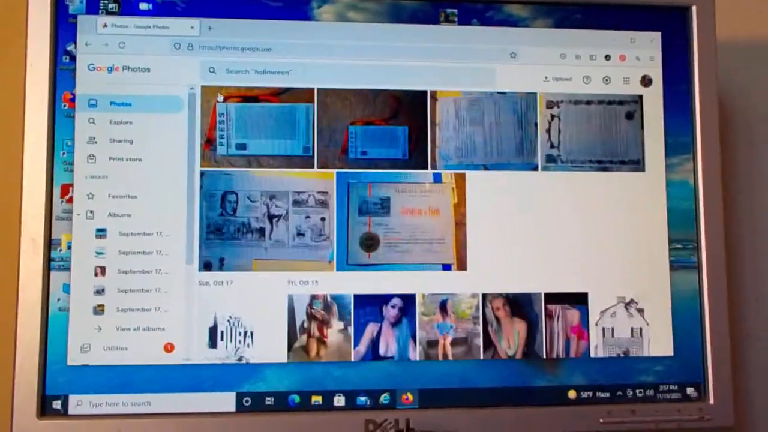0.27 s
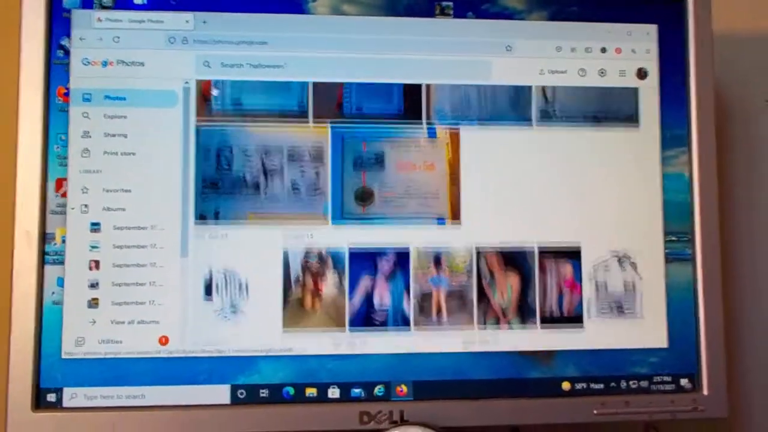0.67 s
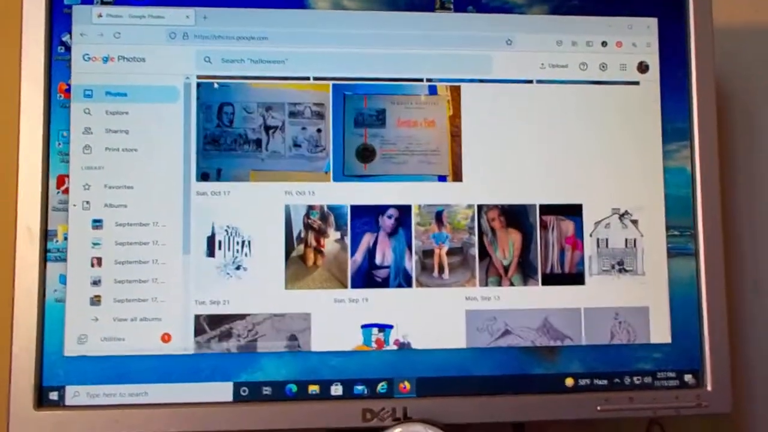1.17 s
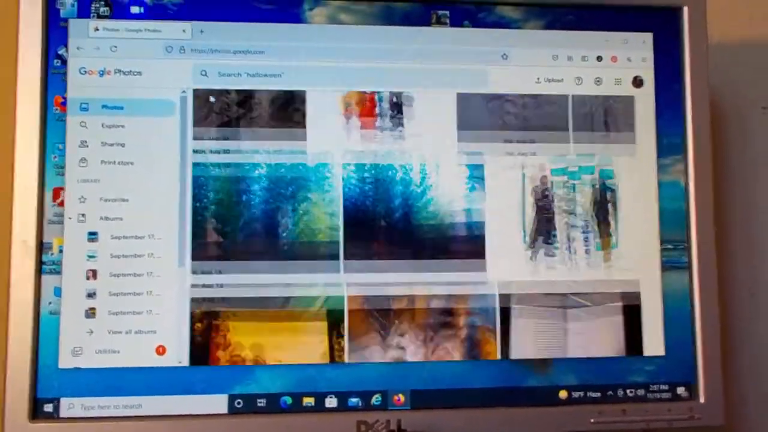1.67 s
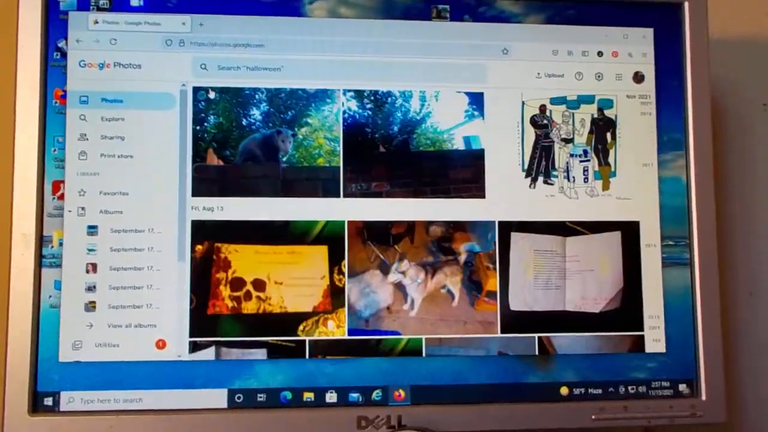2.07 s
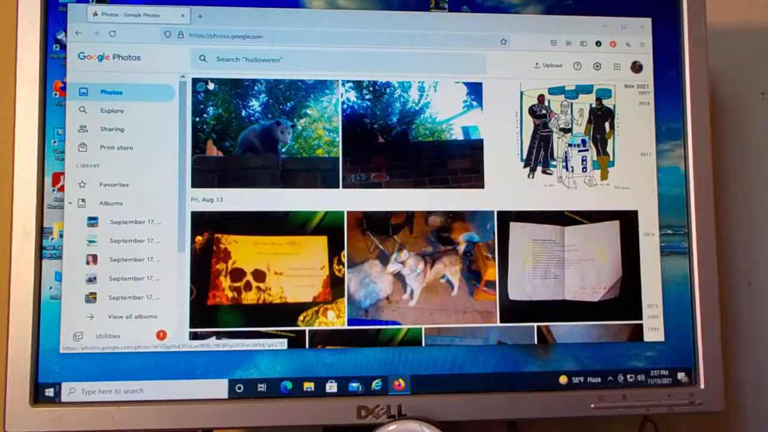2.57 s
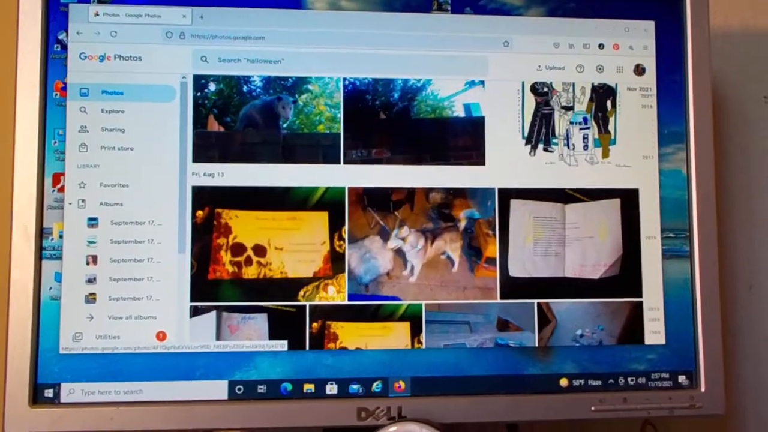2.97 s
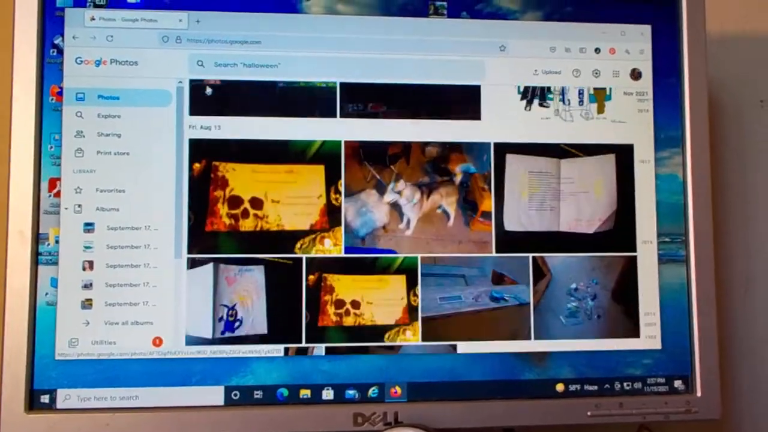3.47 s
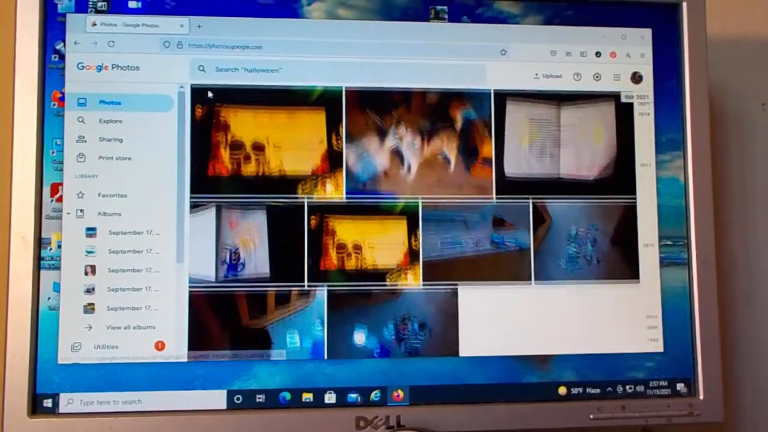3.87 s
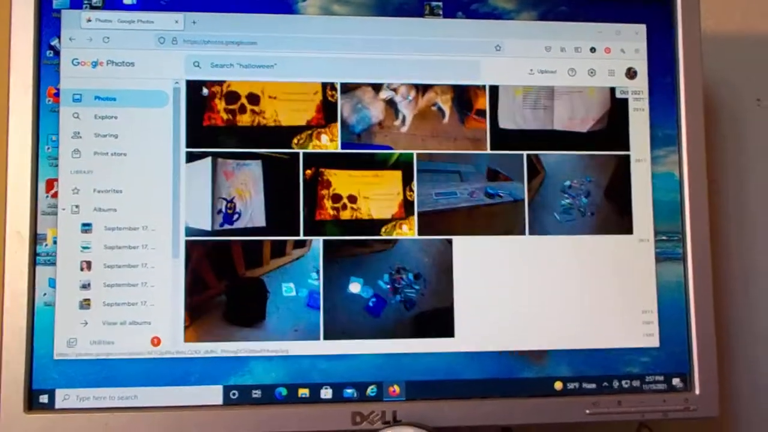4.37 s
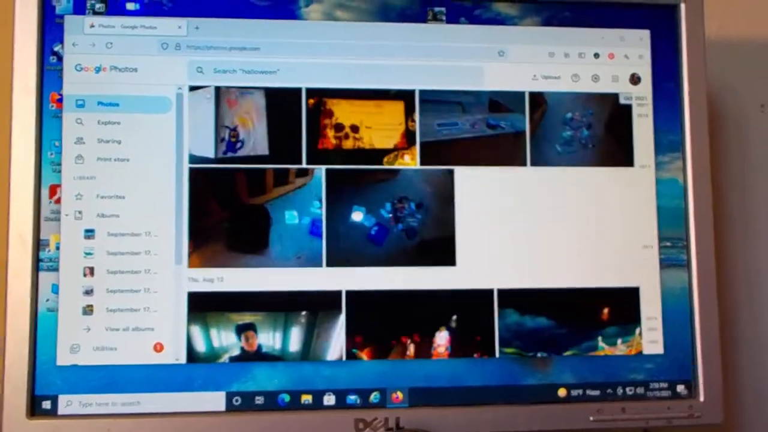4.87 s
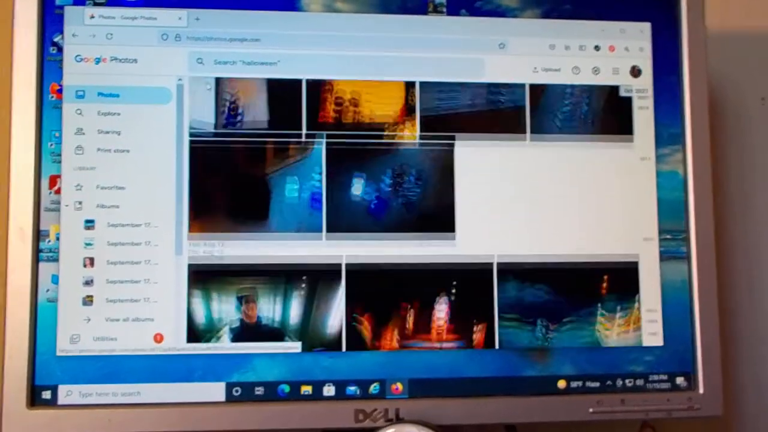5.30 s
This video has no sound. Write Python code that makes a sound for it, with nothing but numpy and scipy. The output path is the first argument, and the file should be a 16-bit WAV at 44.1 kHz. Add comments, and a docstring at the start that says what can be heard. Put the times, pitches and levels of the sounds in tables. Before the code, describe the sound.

A small indoor room with a computer fan: steady airy rush, microphone hiss and a very faint wavering hum throughout. Close to a phone with two microphones, a mouse wheel gives four crisp, rapid plastic ticks at 0 to 0.07 seconds. Soft key-like clatters follow, then uneven clusters of wheel clicks from about 0.63 to 1.32 seconds, with brief finger scuffs. A small knock lands at 1.6, then mostly fan until 2.6. Another strong run begins at 2.7 and thins out by 3.2. Light, loose knocks and chatter continue from 3.2 to 4.05, quieter than the wheel. A third run starts at 4.1, fading through 4.6. After a gap of fan noise, weaker ticks, scuffs and small clatters return from 5.2 until the end around 5.5. Clicks are dry and bright with a tiny springy ring; the sound is thin in bass, with slight room reflection around the knocks.

```python
"""Short bursts of mouse-wheel clicks, with scuffs and clattering keys, over a steady rush and faint hum.
Each wheel notch rings the plastic shell and the wheel's spring as dying sines, and the spring end sings.
Finger scuffs are bursts of noise that shake the same shell; keys are clumps of tiny knocks on cap and base.
A small room answers the keys, and faintly the wheel. Computer fan and microphone hiss are shaped noise and
wavering tones. The nearby two-microphone phone cuts the bass, three slots and the highest treble."""
import sys
import numpy as np
from scipy import signal
from scipy.io import wavfile
from scipy.ndimage import uniform_filter1d

SR = 44100
rng = np.random.default_rng(int(sys.argv[2]) if len(sys.argv) > 2 else 0)


def materialize(psi):
    """Save the field psi as 16-bit PCM at rate SR to the path in sys.argv[1].

    A 1-D psi becomes a single channel; in a 2-D psi each row is a channel.
    """
    bounded = np.clip(np.atleast_2d(psi).T, -1, 1)
    quanta = np.round(bounded * 32767).astype(np.int16)
    wavfile.write(sys.argv[1], SR, quanta)


N = 244314  # length in samples

# Rush of fan and hiss. Each row: pitch in Hz, relative level per Hz in dB.
RUSH_SPECTRUM = [(30, 14), (100, -3.5), (300, -2.5), (800, -1), (1500, -2.5), (2200, -10), (2700, -8),
                 (3600, 3.5), (4200, -3.5), (6000, -8.5), (10000, -10.5), (16000, -7.5)]
# How alike the rush is at both microphones. Each row: pitch in Hz, likeness from 0 (unrelated) to 1 (same).
RUSH_LIKENESS = [(100, 0.31), (400, .2), (1200, 0.46), (3500, 0.48), (6000, .1), (15000, .2)]
# Tones of the fan. Each row: average pitch in Hz, middle level in dB.
FAN_TONES = [(137, -80.5), (215, -93), (546, -86.5), (682, -91), (819, -87), (958, -97), (1221, -86),
             (1761, -84.5), (3718, -99), (3746, -84), (4615, -100)]
# Wheel notches. Each row: start in seconds, peak level in dB, sharpness as extra treble in dB.
NOTCHES = [(0.0031, -12, 7.5), (0.0229, -14, 3.5), (0.0427, -11.5, 9.5), (0.0647, -11, 4.5),
           (0.63, -20.5, 2), (0.6355, -18.5, 2), (0.6439, -7.5, 7.5), (0.672, -24.5, 0),
           (0.6906, -13.5, 4.5), (0.7636, -13.5, 7.5), (0.7865, -10, 7), (0.8686, -24, 0.5),
           (0.954, -31.5, 4.5), (1.0686, -21.5, 4), (1.0876, -11.5, 6.5), (1.166, -10, 5),
           (1.1873, -10.5, 6), (1.2647, -18.5, -11.5), (1.2754, -13, 5), (1.294, -13, 6.5),
           (1.3143, -12, 9.5), (2.6985, -8.5, 7), (2.705, -10.5, 7), (2.7133, -8.5, 6), (2.7393, -13, 6.5),
           (2.7598, -16, 4.5), (2.833, -11, 9), (2.8529, -14, 7.5), (2.9346, -10.5, 7.5), (2.955, -14.5, 4),
           (3.0514, -35.5, 7), (3.0887, -15.5, 3), (3.178, -30, -8), (3.1842, -13, 2.5), (4.1003, -18, 4),
           (4.106, -21.5, 4.5), (4.1144, -8.5, 6), (4.1401, -15.5, 5), (4.1603, -13.5, 5), (4.2325, -13, 9),
           (4.2553, -10.5, 5), (4.3178, -35, 0), (4.3385, -24.5, -0.5), (4.4689, -15, 2),
           (4.574, -38.5, -15), (5.183, -32, 0.5), (5.211, -18, 4.5), (5.226, -18.5, 4.5),
           (5.253, -16, 0.5), (5.3304, -31, 0), (5.4199, -35, 2), (5.451, -33.5, 0)]
# Short bursts of treble noise near some notches. Each row: time in seconds, peak level in dB.
TREBLE_BURSTS = [(0.064, -30.5), (0.6439, -23.5), (0.7844, -29), (1.0877, -43.5), (1.1863, -25.5),
                 (2.6965, -23.5), (2.7127, -21), (2.833, -49), (4.1133, -24), (4.2553, -26)]
# Ringing of mouse shell and desk. Each row: pitch in Hz, time to fade by 60 dB in ms,
# relative left level in dB, relative right level in dB, how far the left wave leads in radians.
SHELL_MODES = [(252.1, 2600, -66, -55.5, 2), (348, 49.7, -32.5, -22, 1.2), (533, 61, -42, -36.5, 1),
               (644, 29.7, -24.5, -19, 2.05), (703, 34, -27.5, -16, -7.3), (852.5, 60, -30.5, -37, 4.5),
               (1006, 80, -43.5, -35, 4.5), (1225, 41, -21, -35, 4.5), (1337, 19, -3.5, -24.5, 1),
               (1473, 24, -7.5, -29.5, 1.73), (1626.7, 21.4, 1, -5, 0.4), (1878, 14, -5, -6.5, -2),
               (1985, 14.1, -14, -2.5, 4), (2047, 8.4, -24.5, -8, 10)]
# Ringing of wheel spring and axle. Each row: pitch in Hz, time to fade by 60 dB in ms,
# relative left level in dB, relative right level in dB, how far the left wave leads in radians.
SPRING_MODES = [(3552, 14, -16, -24.5, 4.2), (3632, 13.2, -33, -13.5, 2.54), (4015, 15.8, -22.5, -26, 3.9),
                (4190, 6.45, -14, -11.5, 1.1), (4580, 3.9, -26, -17.5, .1), (5050, 5.5, -12, -19.5, 1.56),
                (5804, 3.75, -14.5, -37, 0.14), (6934, 4.3, -22.5, -24.5, 0.065),
                (8930, 4.4, -34, -25.5, .1), (9880, 6.44, -38.5, -29.5, 0.12)]
# Key strokes. Each row: start in seconds, peak level in dB, thud against the cap in dB,
# pitch the thud favours in Hz, time for the chatter to drop 20 dB in ms (at least 2 is used).
KEYS = [(0.232, -27.5, -13, 755, 5), (0.347, -35.5, -10.5, 1260, 37), (0.4306, -27, -9.5, 805, 2.5),
        (0.525, -46, -14, 1280, 20), (0.5424, -48, -13.5, 1330, 15), (0.599, -24.5, -12, 770, 8),
        (0.838, -41, -3.5, 1590, 9), (1.5882, -36, -17, 1700, 3.5), (1.6013, -23, -6, 1470, 6.5),
        (2.5985, -49.5, -8.5, 1210, 13), (2.7518, -33, -10, 1620, 9.5), (2.7909, -34, -20, 1230, 9),
        (2.9667, -28, -15, 1210, 5), (3.1004, -42, -10.5, 1240, 19), (3.148, -30.5, -12, 1560, 19),
        (3.258, -45.5, -8, 1240, 35.5), (3.32, -27.5, -13.5, 765, 6.5), (3.4688, -43, -13.5, 1223, 9),
        (3.498, -29.5, -18.5, 760, 13.5), (3.533, -40.5, -16, 1520, 5), (3.6236, -44, -19, 1450, 10),
        (3.6405, -42.5, -14, 1360, 22), (3.691, -25.5, -12.5, 770, 6), (3.809, -43, -9, 815, 5),
        (3.825, -35.5, -6.5, 1430, 14.5), (3.867, -31.5, -9.5, 770, 13), (3.9898, -48.5, -9.5, 857, 4),
        (4.0098, -45, -12.5, 1460, 41), (4.0446, -28.5, -10.5, 750, 13), (4.189, -34, -11, 1240, 20),
        (4.241, -36, -10, 1650, 20), (4.3587, -41.5, -13, 1220, 5), (4.3758, -36, -13, 1450, 11),
        (4.4198, -27.5, -12, 767, 7.5), (5.199, -31, -10, 1580, 19), (5.4225, -29, -14, 1530, 0.5),
        (5.5364, -30, -13, 1370, -3)]
# Ringing of a key cap. Each row: pitch as a multiple of CAP_HZ, time to fade by 60 dB in ms, level in dB.
CAP_MODES = [(.95, 8, 5.5), (1.011, 6.7, 4), (1.179, 5, 0.5), (1.4, 4, -0.5), (1.599, 3.5, -12),
             (1.85, 3, -16.5)]
# Ringing of the keyboard base. Each row: pitch in Hz, time to fade by 60 dB in ms, relative level in dB.
BASE_MODES = [(779, 22, -2.5), (1293, 22, -3.5), (1444, 14, 3.5), (1690, 13, 0)]
# Finger scuffs on the wheel. Each row: start in seconds, relative level in dB,
# fade length in ms (at least 3 is used).
SCUFFS = [(0.615, -53, 16), (0.748, -50.5, 9.1), (0.846, -45.5, 10), (0.883, -50.5, 7.6), (0.958, -49, 7.5),
          (0.98, -50.5, 18), (1.009, -52.5, 7.2), (1.047, -55.5, 50), (1.147, -56, 14), (1.257, -52, 4.6),
          (2.68, -43, 11.4), (2.816, -43, 28), (2.916, -45.5, 7.5), (3.058, -54, 23), (3.16, -53, 26),
          (4.085, -41.5, 5.1), (4.125, -41, 2.4), (4.217, -49, 13), (4.351, -47.5, 8), (4.452, -43, 6.4),
          (4.487, -53, 8.3), (4.564, -50.5, 24), (4.588, -48, 4.5), (4.645, -53.5, 4.3), (5.192, -44, 38.5),
          (5.239, -67, 11), (5.317, -50, 33), (5.344, -54, 10.6), (5.356, -43.5, 5.6), (5.428, -51.5, 21),
          (5.458, -44, 3.2), (5.527, -49.5, 11)]
# Slots cut by the phone. Each row: centre in Hz, width in Hz, depth in dB.
SLOTS = [(2433, 1500, 35.5), (2928, 1730, 21), (7990, 3480, 38)]

RUSH_DB, RUSH_LEFT_DB = -63.5, 1  # overall level; left against right
HISS_EDGE_HZ = 15800  # no rush above this
UPPER_SHARE = 0.89  # dB on the shell modes above 1700 Hz for each dB of sharpness
PUSH_MS, PUSH_DB = 7, -28.5  # time to the push's peak; right level against the notch
BURST_LEFT_DB, BURST_MS, BURST_LATE_S = -9, 1.4, 0.00065  # left against right; length scale; delay
TINE_HZ, TINE_T60_S, TINE_DB = 1244, 0.32, -35.5  # pitch; time to fade by 60 dB; level against the notch
ROOM_T60_S, ROOM_TREBLE_T60_S, ROOM_SPLIT_HZ = 0.21, 0.15, 3000  # the treble dies sooner
KEY_ROOM_DB, WHEEL_ROOM_DB = -2, -31.5  # how much of each goes into the room
CAP_HZ = 3704  # middle pitch of a cap
REBOUND_S, REBOUND_DB = 0.0115, -11.5  # the cap bounces once
BASS_HZ, TREBLE_EDGE_HZ = 438, 16560  # the phone's range


def amp(db):
    """Turn decibels into a multiplier."""
    return 10 ** (np.asarray(db) / 20)


def read(points, hz):
    """Read a curve between its points, spaced by pitch ratio."""
    f, value = np.transpose(points)
    return np.interp(np.log(hz + 1), np.log(f + 1), value)


def add(mix, start_s, sound):
    """Add a sound to the mix at its start time, cut off at the end."""
    at = round(start_s * SR)
    part = mix[..., at:at + sound.shape[-1]]
    part += sound[..., :part.shape[-1]]


def ring(modes, extra_db, size=6000):
    """Dying sines at both microphones; the left one is further off, so its sound swells in more slowly."""
    hz, t60_ms, left_db, right_db, lead = np.transpose(modes)[:, :, None]
    t = np.arange(size) / SR
    fade = amp(extra_db[:, None] - 60e3 * t / t60_ms)
    left = amp(left_db) * np.sin(2 * np.pi * hz * t + lead)
    left = left * (1 - np.exp(-(t / 0.0013) ** 2))
    right = amp(right_db) * np.sin(2 * np.pi * hz * t)
    right = right * (1 - np.exp(-(t / 0.00062) ** 2))
    return np.array([(fade * left).sum(0), (fade * right).sum(0)])


def peaked(x):
    """Scale so that the average of both microphones peaks at 1."""
    return x / abs(x.mean(0)).max()


def air():
    """Fan rush and microphone hiss are shaped noise; the fan's tones waver in pitch and level."""
    frames, hz = N // 256 + 5, np.fft.rfftfreq(1024, 1 / SR)
    a, b, c, d = rng.standard_normal((frames, 513, 4)).T
    left, other = a + 1j * b, c + 1j * d
    same = np.clip(read(RUSH_LIKENESS, hz), -1, 1)[:, None]
    right = same * left + np.sqrt(1 - same ** 2) * other
    shape = amp(read(RUSH_SPECTRUM, hz)) * (hz < HISS_EDGE_HZ)
    spectrum = np.array([left, right]) * shape[:, None]
    rush = signal.istft(spectrum, nperseg=1024, noverlap=768)[1][:, :N]
    out = amp(RUSH_DB) * rush / rush.std() * amp([[RUSH_LEFT_DB / 2], [-RUSH_LEFT_DB / 2]])

    # slow random curves, 100 points a second
    slow = rng.standard_normal((2, len(FAN_TONES), N // 441 + 2))
    slow = uniform_filter1d(slow, 20) * np.sqrt(20)
    t = np.arange(N) / 441
    for (hz, db), drift, swell in zip(FAN_TONES, *slow):
        points = np.arange(len(drift))
        pitch = hz * (1 + 0.0008 * np.interp(t, points, drift))
        turns = np.cumsum(pitch) / SR
        level = np.sqrt(2) * amp(db + 3.2 * np.interp(t, points, swell))
        out = out + level * np.sin(2 * np.pi * turns)
    return out


def notches():
    """The spring drops into a notch, knocks the shell and shoves the desk."""
    out, modes = np.zeros((2, N)), SHELL_MODES + SPRING_MODES
    upper = np.transpose(SHELL_MODES)[0] > 1700
    sharp_share = np.r_[upper * UPPER_SHARE, np.ones(len(SPRING_MODES))]
    grips = rng.standard_normal((len(NOTCHES), len(modes)))
    u = np.arange(4000) / SR / (PUSH_MS / 1e3)
    push = u * np.exp(1 - u)
    for (start_s, db, sharp_db), grip in zip(NOTCHES, grips):
        # the hand changes the strength of each mode a little every time
        extra_db = 1.8 * grip + sharp_db * sharp_share
        add(out, start_s, amp(db) * peaked(ring(modes, extra_db)))
        push_db = db + PUSH_DB
        add(out, start_s, amp([[push_db - 4], [push_db]]) * push)
    return out


def treble_bursts():
    """Short treble noise bursts are added near some notches: noise that swells and fades quickly."""
    out, t = np.zeros((2, N)), np.arange(400) / SR
    swell = t * np.exp(-1e3 * t / BURST_MS * np.e)
    bursts = rng.standard_normal((len(TREBLE_BURSTS), 2, 400)) * swell
    for (time_s, db), burst in zip(TREBLE_BURSTS, bursts):
        level = amp([[db + BURST_LEFT_DB], [db]])
        add(out, time_s + BURST_LATE_S, level * burst / abs(burst).max())
    return out


def tine():
    """The spring's free end sings as a dying sine after each notch, until it fades or the next stops it."""
    out = np.zeros(N)
    starts, peaks_db = np.transpose(NOTCHES)[:2]
    stops = np.r_[starts[1:], N / SR]
    for start, stop, peak_db in zip(starts, stops, peaks_db):
        t = np.arange(0, min(stop - start, TINE_T60_S), 1 / SR)
        edges = np.clip(np.minimum(t, t[::-1]) / 0.002, 0, 1)  # soft start and stop
        fade = amp(peak_db + TINE_DB - 60 * t / TINE_T60_S)
        add(out, start, fade * edges * np.sin(2 * np.pi * TINE_HZ * t))
    return out


def room(x):
    """Sparse reflections of random sign die away, partly shared by the two microphones."""
    size = SR // 2
    taps, t = np.zeros((3, size)), np.arange(size) / SR
    at = np.arange(100, size - 20, 20)
    at = at + rng.integers(0, 20, (3, len(at)))
    np.put_along_axis(taps, at, rng.choice([-1., 1.], at.shape), 1)
    taps = taps[:2] * 0.33 + taps[2]  # own reflections plus shared ones
    low = signal.sosfiltfilt(signal.butter(2, ROOM_SPLIT_HZ, fs=SR, output="sos"), taps)
    high = taps - low
    taps = low * amp(-60 * t / ROOM_T60_S) + high * amp(-60 * t / ROOM_TREBLE_T60_S)
    return signal.fftconvolve(x[None], taps / np.linalg.norm(taps[0]), axes=1)[:, :N]


def keys():
    """A cap bottoms out, bounces and chatters on its stem: clumps of tiny knocks ring cap and base."""
    out, t = np.zeros(N), np.arange(3000) / SR
    chance = rng.standard_normal((len(KEYS), 3, 3000))
    cap = [(CAP_HZ * k, t60, db) for k, t60, db in CAP_MODES]
    for (start_s, db, thud_db, thud_hz, ms), (tune, grain, clump) in zip(KEYS, chance):
        # base modes weaken by 8.8 dB an octave away from the favoured pitch
        base = [(f, t60, d + thud_db - 8.8 * abs(np.log2(f / thud_hz))) for f, t60, d in BASE_MODES]
        hz, t60_ms, mode_db = np.transpose(cap + base)[:, :, None]
        hz = hz * (1 + 0.022 * tune[:len(hz), None])  # each stroke is tuned a little differently
        fade = amp(mode_db - 60e3 * t / t60_ms)
        body = (fade * np.sin(2 * np.pi * hz * t)).sum(0)
        body = body * (1 - np.exp(-(t / 0.00024) ** 2))

        clump_db = 45 * uniform_filter1d(clump, 80)
        drop_db = -20e3 * t / max(ms, 2)
        chatter = grain * amp(clump_db + drop_db) * np.clip(t / 0.00047, 0, 1)
        rebound = np.roll(chatter, round(REBOUND_S * SR)) * (t >= REBOUND_S)
        chatter = chatter + amp(REBOUND_DB) * rebound
        hit = signal.fftconvolve(chatter, body)[:3000]
        add(out, start_s, amp(db) * hit / abs(hit).max())
    return out


def scuffs():
    """Uneven skin friction, as rough bursts of noise, shakes the same shell and spring."""
    push, t = np.zeros(N), np.arange(2500) / SR
    modes = SHELL_MODES + SPRING_MODES
    for start_s, db, ms in SCUFFS:
        grain, roughness = rng.standard_normal((2, 2500))
        stroke = np.clip(t / 0.00071, 0, 1) * np.exp(-(1e3 * t / max(ms, 3)) ** 2)
        add(push, start_s, amp(db) * stroke * grain * amp(4.54 * roughness))
    tilt_db = -4.5 * np.log2(np.transpose(modes)[0] / 1200)  # a soft push favours the low modes
    body = ring(modes, tilt_db)
    body = body / np.linalg.norm(body.mean(0))
    return signal.oaconvolve(push[None], body, axes=1)[:, :N]


def scene():
    """Mix the wheel, the keys, their room sound and the air."""
    background = air()
    wheel = notches() + treble_bursts() + tine() + scuffs()
    typing = keys()
    into_room = amp(KEY_ROOM_DB) * typing + amp(WHEEL_ROOM_DB) * wheel.mean(0)
    return wheel + typing + room(into_room) + background


def record(dry):
    """The phone's filters: a bass cut, three deep slots, then a treble limit."""
    out = signal.sosfilt(signal.butter(2, BASS_HZ, "high", fs=SR, output="sos"), dry)
    for hz, width_hz, depth_db in SLOTS:
        middle = -2 * np.cos(2 * np.pi * hz / SR)
        a = np.tan(np.pi * width_hz / SR)
        kept = a * amp(-depth_db)
        out = signal.lfilter([1 + kept, middle, 1 - kept], [1 + a, middle, 1 - a], out)
    limit = signal.firwin(511, TREBLE_EDGE_HZ, window=("kaiser", 9), fs=SR)
    return signal.oaconvolve(out, limit[None], "same")


dry = scene()
out = record(dry)
materialize(out)
```